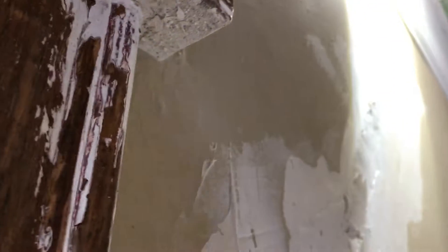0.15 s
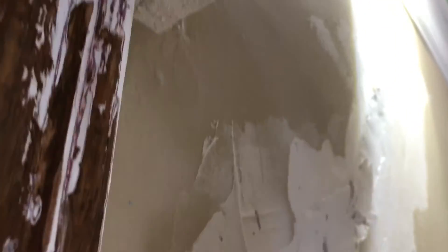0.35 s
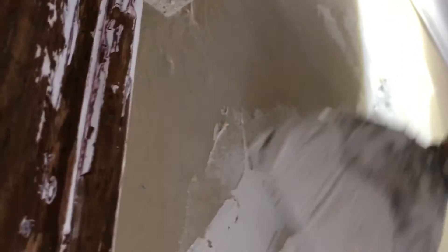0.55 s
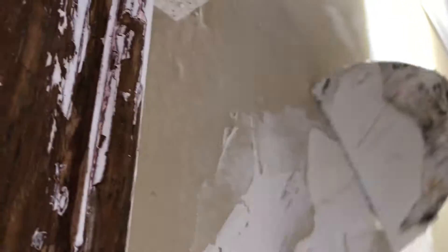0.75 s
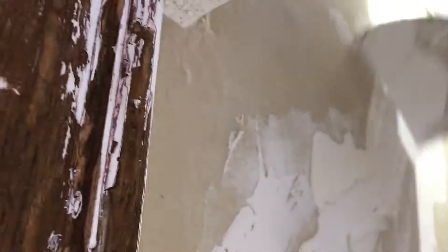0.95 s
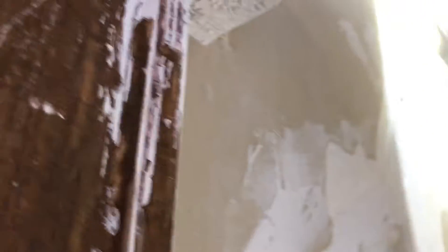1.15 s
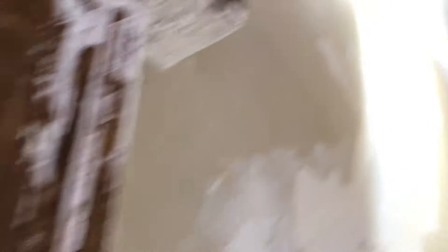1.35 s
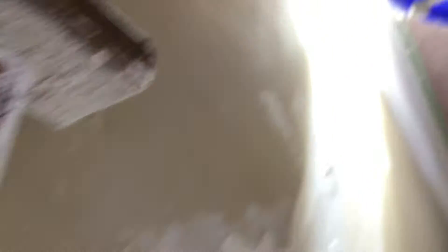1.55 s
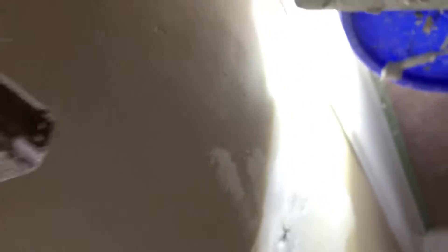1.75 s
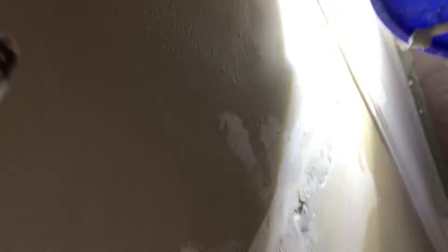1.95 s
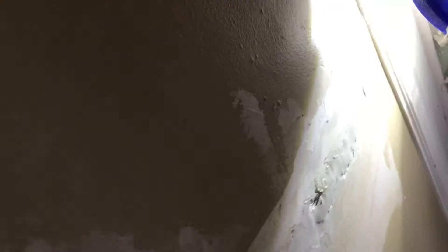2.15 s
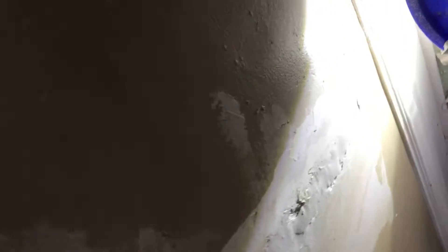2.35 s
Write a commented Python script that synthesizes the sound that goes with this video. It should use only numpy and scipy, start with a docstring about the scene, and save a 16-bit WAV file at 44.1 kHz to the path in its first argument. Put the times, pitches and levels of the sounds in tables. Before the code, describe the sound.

A steel filling knife scrapes gritty wet filler across a plaster wall, then a softer brushing swipe

```python
"""Over a low rumble, a few taps set a steel blade against a plaster wall, each a burst of short ringing modes.
The blade drags wet filler in one long gritty stroke and flicks off hard: noise grains drive its resonances.
A softer, brighter brushing swipe follows, grainy noise that thins to a rustle with two ticks and a faint squeak.
Near echoes and a short noise tail make the bare echoing room; shaped noise makes its rumble and hiss."""
import sys
import numpy as np
from scipy import signal
from scipy.fft import rfft, irfft, next_fast_len
from scipy.io import wavfile
from scipy.ndimage import map_coordinates

SR = 44100
rng = np.random.default_rng(int(sys.argv[2]) if len(sys.argv) > 2 else 0)


def volts_from_db(level):
    """Convert decibel levels to linear amplitude ratios."""
    exponent = np.asarray(level, float) / 20
    return 10 ** exponent


def pcm_store(signal):
    """Save signal as 16-bit PCM."""
    levels = np.round(np.clip(np.atleast_2d(signal), -1, 1) * 32767)
    wavfile.write(sys.argv[1], SR, levels.astype(np.int16).T)


N = 110250  # samples


def unit(x):
    """Scaled to rms 1."""
    return x / np.sqrt(np.mean(x ** 2) + 1e-20)


def along(points, hz):
    """Reads (Hz, value) points on a log frequency axis."""
    f, v = np.transpose(points)
    return np.interp(np.log(hz + 1), np.log(f + 1), v)


def curves(rows):
    """One value per sample for each column after the time."""
    s, *cols = np.transpose(rows)
    return [np.interp(np.arange(N) / SR, s, c) for c in cols]


def wobble(rate):
    """A smooth random curve, rate knots a second."""
    knots = rng.standard_normal(int(N * rate / SR) + 4)
    return map_coordinates(knots, [np.arange(N) * rate / SR])


def filtered(x, response):
    """x times a complex response of frequency."""
    m = next_fast_len(N + SR // 2)
    return irfft(rfft(x, m) * response(np.fft.rfftfreq(m, 1 / SR)), m)[..., :N]


def coloured(x, spectrum):
    """x through a (Hz, dB) spectrum, rms 1."""
    return unit(filtered(x, lambda hz: volts_from_db(along(spectrum, hz))))


def resonant(modes):
    """The causal response of a set of resonances, with alternating signs."""
    def response(f):
        total = 0
        for k, (hz, width, db) in enumerate(modes):
            total = total + (-1) ** k * volts_from_db(db) * 1j * f * width / (hz * hz - f * f + 1j * f * width)
        return total
    return response


def grains(rate, spread_db, share):
    """Random grains of uneven size, rate a second, mixed with a power share of smooth noise."""
    hit = rng.random(N) < rate / SR
    size = np.minimum(rng.exponential(size=N), 3.5)
    sign = rng.standard_normal(N)
    smooth = rng.standard_normal(N)
    share = np.clip(share, 0, 1)
    rough = unit(hit * sign * volts_from_db(spread_db * size))
    return np.sqrt(1 - share) * rough + np.sqrt(share) * smooth


def add(track, s, sound):
    """Mixes a sound in at a time in seconds."""
    part = track[round(s * SR):][:len(sound)]
    part += sound[:len(part)]


# The long stroke and its flick: (time [s], pressure [dB], grit over the blade [dB],
# upper blade modes, relative [dB], middle blade modes, relative [dB], fine over coarse grit [dB])
STROKE = [(.27, -34.5, -26, -17, -15, -2), (.33, -43.5, -12, -20.5, 0, 5.5),
          (.36, -29.5, -13.5, -12.5, -8, -1), (.4, -33.5, -9, -2.5, 2.5, 2.5), (.46, -31, -7, 0, 1, 3),
          (.505, -31.5, -11, -3, 3.5, 4.5), (.545, -37, -9.5, -10, -2.5, 2),
          (.575, -32.5, -13.5, -7, -0.5, 4.5), (.625, -31, -9.5, -3.5, 2, 5), (.66, -28, -12, -13, -1, 1),
          (.695, -29, -15.5, -10, -2, 3), (.72, -25, -11.5, -15, 0, 2), (.76, -29, -12, -12, -2.5, 0),
          (.81, -32.5, -13.5, -14, -3, 0), (.9, -36.5, -11, -11, -0.5, 0), (.972, -39, -4.5, -23, 3, -5),
          (.98, -32.5, -15, -21, -2, -0.5), (.995, -29, -12, -15, -1.5, -3),
          (1.01, -21.5, -13, -20, -0.5, -9.5), (1.035, -19.5, -17, -17, -9, -12.5),
          (1.047, -27, -12, -13, 4, -11.5), (1.058, -18.5, -22, -21, -3.5, -10),
          (1.07, -21.5, -14, -17, -1, -14), (1.085, -18.5, -19, -20, 0, -18.5),
          (1.116, -19.5, -17, -19, 2.5, -12), (1.124, -33.5, -17, -7, -9, -6.5)]


def stroke():
    """Sand grains under the edge shake the blade and the wall and hiss; pressure drives all of them."""
    press_db, grit_db, upper_db, middle_db, fine_db = curves(STROKE)
    t = np.arange(N) / SR
    landing_s, lift_s = 0.046, 0.013  # linear rise ahead of the first row, decay constant after the last
    landing = np.clip((t - STROKE[0][0]) / landing_s + 1, 0, 1)
    touch = landing * np.exp(-np.maximum(t - STROKE[-1][0], 0) / lift_s)
    drag = touch * volts_from_db(press_db + 1.4 * wobble(89.558))
    rub = grains(2500, 2, 0.72)
    lumps = catches()
    blade = dragged_blade(drag * rub + lumps, rub, middle_db, upper_db)
    return blade + rubbed_wall(rub, touch, press_db) + sand(drag, lumps, grit_db, fine_db)


# The edge catches a lump: (time [s], level before a common lift [dB])
CATCHES = [(0.3369, -21.5), (.667, -40), (0.717, -13), (0.745, -16.5), (.979, -23), (1.079, -16),
           (1.086, -11), (1.09, -19), (1.111, -22)]


def catches():
    """Each lump jolts the edge with a short decaying burst of noise."""
    lumps = np.zeros(N)
    lift_db = 5
    n = np.arange(130)
    for s, db in CATCHES:
        add(lumps, s, volts_from_db(db + lift_db) * np.exp(-n / 25) * rng.standard_normal(130))
    return lumps


# Low, middle and upper modes of the dragged blade: (frequency [Hz], width [Hz], relative level [dB])
LOW_MODES = [(670, 220, -12), (852, 128.74, 1), (1065, 130, 2), (1212, 156, 1.5), (1488.6, 190, -5)]
MIDDLE_MODES = [(1714, 220, -2.5), (2064.4, 193, 0.5), (2250, 208, 1.5), (2611.6, 290, -5)]
UPPER_MODES = [(3270, 440, 3), (3800, 470, 2.5), (4600, 660, -4.5)]
# The blade's sound is kept within a band: (lower edge [Hz], upper edge [Hz])
BLADE_BAND_HZ = (444, 6160)


def dragged_blade(force, rub, middle_db, upper_db):
    """Grains and lumps excite the blade; each mode comes and goes by itself as the blade bends."""
    def shake(modes, db):
        total = np.zeros(N)
        for k, mode in enumerate(modes):
            flex = volts_from_db(1.7 * wobble(24))
            total += (-1) ** k * filtered(flex * volts_from_db(db) * force, resonant([mode]))
        return total / np.std(filtered(rub, resonant(modes)))

    blade = shake(LOW_MODES, -4) + shake(MIDDLE_MODES, middle_db - 2.5) + shake(UPPER_MODES, upper_db)
    low_hz, top_hz = BLADE_BAND_HZ
    return filtered(blade, lambda hz: 1j * hz / (low_hz + 1j * hz) / (1 + 1j * hz / top_hz) ** 2)


# Body of the rubbed wall: (frequency [Hz], relative level per Hz [dB])
WALL = [(120, -14), (170, -6), (260, -4), (330, -1.5), (480, -4.5), (700, -8), (1000, -23.5)]


def rubbed_wall(rub, touch, press_db):
    """The wall hums low under the rub, a little less steeply than the pressure grows."""
    level_db = -45.5 + 0.86 * (press_db + 35)  # -45.5 dB at a light pressure of -35 dB
    return touch * volts_from_db(level_db + 2.9 * wobble(12.57)) * coloured(rub, WALL)


# Coarse and fine sand: (frequency [Hz], relative level per Hz [dB])
COARSE = [(2000, -30), (3000, 2.5), (4500, -0.5), (6000, 6), (8000, 1), (10000, -1), (13000, -28.5)]
FINE = [(6000, -45), (9000, -14.5), (11000, -1), (13500, 2.5), (16000, 3)]


def sand(drag, lumps, grit_db, fine_db):
    """Coarse and fine sand hiss with the drag, and the lumps crunch in the coarse colour."""
    grit = grains(6800, 3.554, 0.99)
    hiss = volts_from_db(grit_db) * (coloured(grit, COARSE) + volts_from_db(fine_db) * coloured(grit, FINE))
    crunch = volts_from_db(-20.5) * coloured(lumps, COARSE) * np.std(lumps)
    return drag * hiss + crunch


# Touches of the edge: (time [s], relative level [dB], upper modes [dB], crack [dB])
TAPS = [(0.1624, -22, -4, -14), (0.2129, -28, -9, -24), (0.2225, -23, -30, -16.5), (0.2402, -5, 7, -16)]
# Modes of the struck blade: (frequency [Hz], relative level [dB], t60 [s])
RING = [(151, -20, 0.065), (335.44, -12, 0.024), (987, -3.5, 0.015), (1260.8, -1.5, 0.013),
        (1707, -2.5, 0.0041), (2370, 0, 0.0069), (2900, -1.5, 0.0036), (3803, 0, 0.0051),
        (4501.1, -10, 0.0051), (5270.5, -8, 0.004065), (6653, -14, 0.003057)]


def taps():
    """The edge meets the wall: short blade modes ring under a crack of noise."""
    out = np.zeros(N)
    t = np.arange(SR // 2) / SR
    split_hz, crack_t60_s, rise_s = 2700, 0.018, 0.0001  # the upper modes lie above the split
    for s, db, upper_db, crack_db in TAPS:
        ring = np.zeros(len(t))
        for hz, level_db, t60 in RING:
            decay = volts_from_db(level_db + upper_db * (hz > split_hz) - 60 * t / t60)
            ring += decay * np.sin(2 * np.pi * hz * t + rng.normal(0, 0.96))
        crack = volts_from_db(crack_db - 60 * t / crack_t60_s) * rng.standard_normal(len(t))
        add(out, s, volts_from_db(db - 7) * (ring * (1 - np.exp(-t / rise_s)) + crack))
    return out


# Low modes of the first touch: (frequency [Hz], level [dB], t60 [s])
THUD = [(56.946, -26.5, 0.12), (100, -30.5, 0.12073)]


def thud():
    """The first touch thuds: two low decaying sines with a soft onset."""
    out = np.zeros(N)
    t = np.arange(SR // 2) / SR
    start_s, rise_s = 0.165, 0.0018
    for hz, db, t60 in THUD:
        add(out, start_s, volts_from_db(db - 60 * t / t60) * (1 - np.exp(-t / rise_s)) * np.sin(2 * np.pi * hz * t))
    return out


# The swipe and the rustle: (time [s], strength [dB])
BRUSH = [(1.44, -67), (1.505, -64), (1.515, -54.5), (1.56, -56.5), (1.585, -62), (1.62, -58.5),
         (1.658, -56), (1.672, -43), (1.69, -36.5), (1.72, -39.5), (1.76, -45.5), (1.83, -49.5),
         (1.92, -52.5), (2.0, -53.5), (2.09, -58), (2.115, -54), (2.15, -60.5), (2.2, -59), (2.27, -57.5),
         (2.32, -58.5), (2.345, -59.5), (2.4, -62), (2.5, -62.5)]
# Body of the brushing and its bright sheen: (frequency [Hz], relative level per Hz [dB])
BRISTLE = [(180, -9), (300, -4), (750, -6), (1100, -2), (1800, -4), (2700, -4.5), (3700, -6), (4800, -6.5),
           (6500, -4.5), (8500, -8.5), (12000, -10.5), (16000, -10.5)]
SHEEN = [(3000, -30), (4500, -6), (6500, 0), (9000, -4), (14000, -4.5), (16000, 0)]


def brushing():
    """A bright grainy swipe thins to a rustle; the stronger it is, the more sheen it has."""
    level_db, = curves(BRUSH)
    hairs = grains(3000, 2.4, 0.63)
    started = np.arange(N) / SR > BRUSH[0][0]
    strength = started * volts_from_db(level_db + 0.957 * wobble(39.58))
    sheen = volts_from_db(0.82 * (level_db + 33.5)) * coloured(hairs, SHEEN)  # 0.82 dB more per dB of strength
    return strength * (coloured(hairs, BRISTLE) + sheen)


# Two ticks: (time [s], level [dB], frequency [Hz], t60 [s])
TICKS = [(2.0008, -44.5, 5687, 0.01974), (2.4808, -49.5, 6100, .035)]


def ticks():
    """Each tick is a high decaying sine, roughened by a random wobble of its phase."""
    out = np.zeros(N)
    t = np.arange(SR // 10) / SR
    for s, db, hz, t60 in TICKS:
        phase = 2 * np.pi * hz * t + 2.0 * wobble(1269.5)[:len(t)]
        add(out, s, volts_from_db(db - 60 * t / t60) * np.sin(phase))
    return out


# Faint rising squeak: (time [s], frequency [Hz], level [dB])
SQUEAK = [(2.415, 1370, -64), (2.432, 1430, -59), (2.45, 1560, -58), (2.468, 1645, -57), (2.5, 1660, -54)]


def squeak():
    """A sine glides up in pitch while its level wavers."""
    hz, db = curves(SQUEAK)
    started = np.arange(N) / SR > SQUEAK[0][0]
    return started * volts_from_db(db + 1.4 * wobble(60)) * np.sin(2 * np.pi * np.cumsum(hz) / SR)


# Decay of the tail: (frequency [Hz], t60 [s])
ROOM = [(200, 0.9768), (1000, 0.7846), (2500, 0.75), (5000, 0.78), (10000, 0.28), (16000, 0.15)]
# Echoes of the near walls: (time [s], relative level [dB])
EARLY = [(.0022, -12), (.0036, -19), (.0055, -22), (.0075, -17), (.0095, -28), (.0112, -32), (.016, -21.5),
         (.024, -23.5)]


def room(x):
    """Bare walls answer: a few near echoes, then a tail where each frequency dies at its own speed."""
    hz, t, z = signal.stft(rng.standard_normal(SR), SR, nperseg=256)
    decay = volts_from_db(-60 * t / along(ROOM, hz)[:, None])
    tail = signal.istft(z * decay, SR, nperseg=256)[1]
    answer = np.pad(volts_from_db(-15) * tail / np.linalg.norm(tail), (200, 0))  # the tail starts 200 samples late
    for s, db in EARLY:
        scatter = np.hanning(50) * rng.standard_normal(50)
        add(answer, s, volts_from_db(db) * np.convolve(scatter, np.hanning(7)) / 8)
    return signal.fftconvolve(x, answer)[:N]


# Swell of the low rumble: (time [s], level [dB])
RUMBLE = [(0, -52), (.15, -48), (.25, -40.5), (.43, -53.5), (.58, -44.5), (.63, -57.5), (.67, -44.5),
          (.87, -47.5), (.95, -41), (1.2, -49), (1.42, -53.5), (1.5, -53), (1.63, -54.5), (1.75, -47.5),
          (2.11, -52), (2.5, -51)]
# Colour of the rumble and of the hiss: (frequency [Hz], relative level per Hz [dB])
LOWS = [(18, -34), (30, -0.5), (91, -2.5), (124, -8), (135, -19), (210, -13), (300, -19.5), (390, -47),
        (660, -120)]
AIR = [(88, -6), (150, -0.5), (431, -10.5), (566, -8.5), (790, -13), (1060, -11), (1530, -14.5),
       (2220, -20), (2810, -23), (16000, -35.5)]


def air():
    """The room's floor: a noise rumble that swells and sinks, and faint steady hiss."""
    rumble_db, = curves(RUMBLE)
    hiss = volts_from_db(-57.5) * coloured(rng.standard_normal(N), AIR)
    return hiss + volts_from_db(rumble_db) * coloured(rng.standard_normal(N), LOWS)


def scene():
    """All sources in the room, over its floor."""
    near = stroke() + taps() + thud() + brushing() + ticks() + squeak()
    return (near + room(near) + air())[None]


def top_cut(x):
    """Nothing passes above the cut-off."""
    return signal.sosfilt(signal.butter(12, 16790, fs=SR, output="sos"), x)


# Treble of the microphone: (frequency [Hz], gain [dB])
MIC = [(7000, -1), (8000, -2.5), (9000, 1.5), (10400, -4), (11500, 0.5), (15700, -3), (15950, -33),
       (16800, -50)]


def record(dry):
    """A small microphone with dips in its treble and little deep bass."""
    low_hz = 42
    mix = filtered(dry, lambda hz: volts_from_db(along(MIC, hz)) * hz ** 6 / (hz ** 6 + low_hz ** 6))
    return top_cut(mix)


dry = scene()
out = record(dry)
pcm_store(out)
```